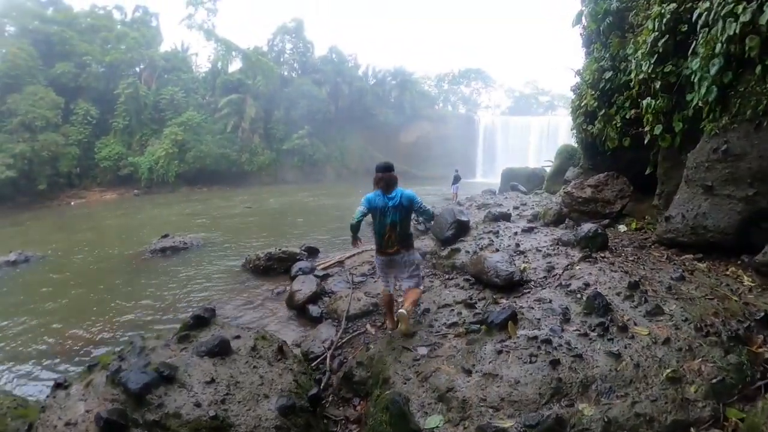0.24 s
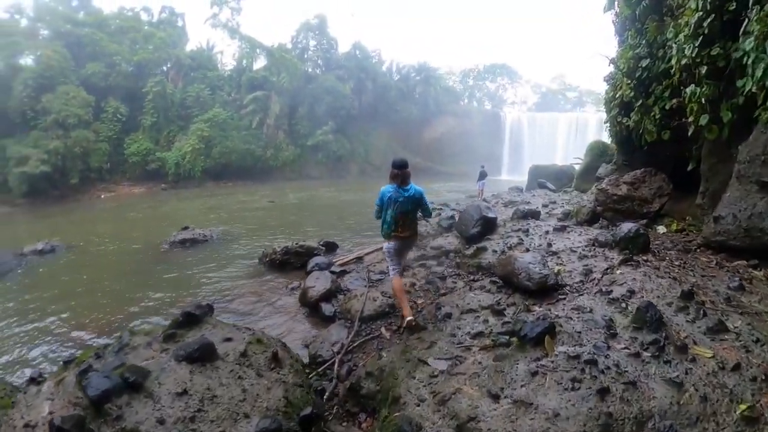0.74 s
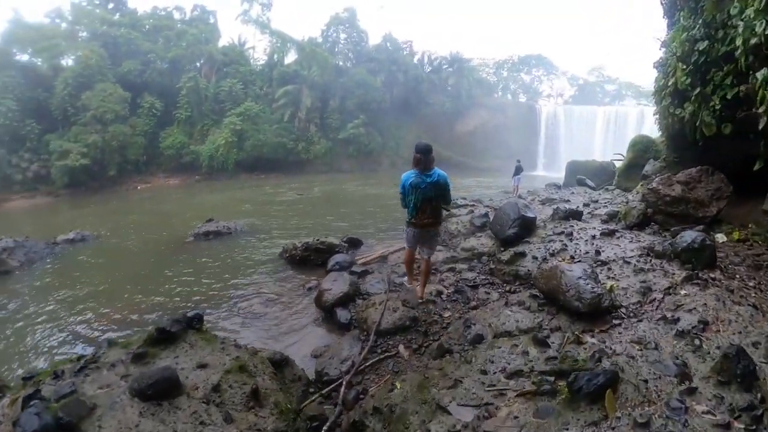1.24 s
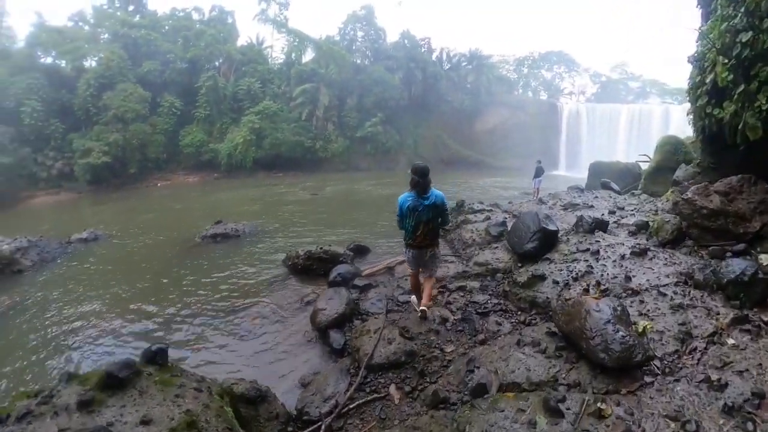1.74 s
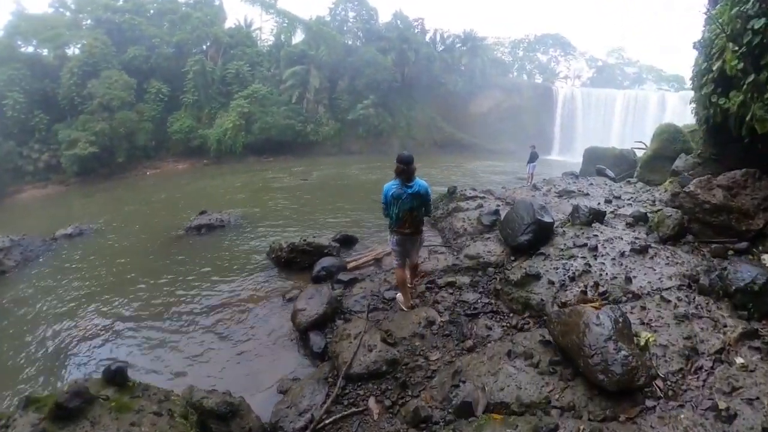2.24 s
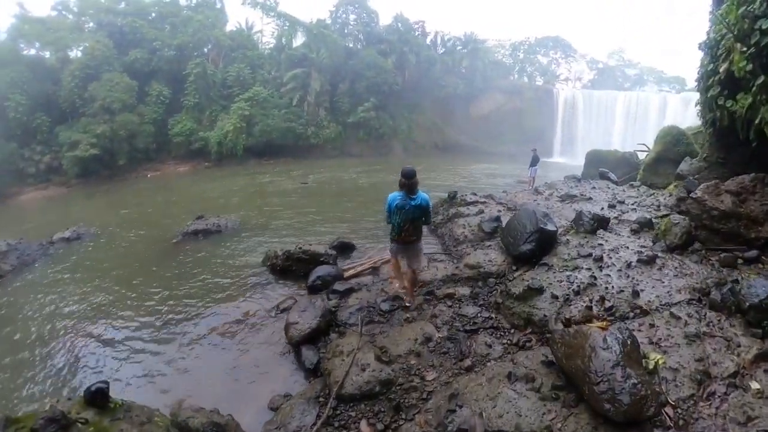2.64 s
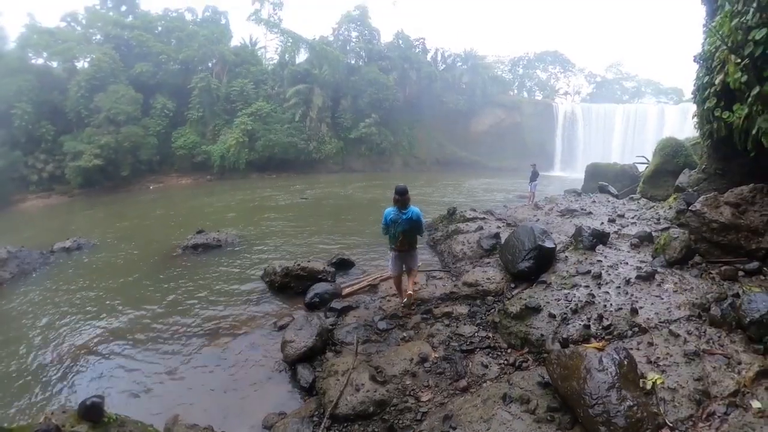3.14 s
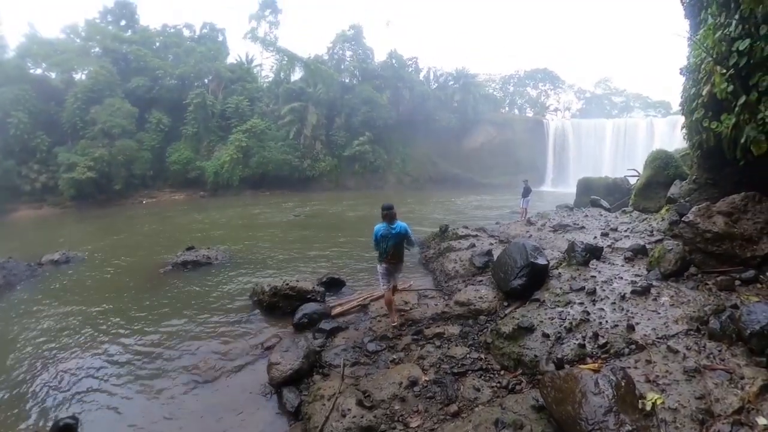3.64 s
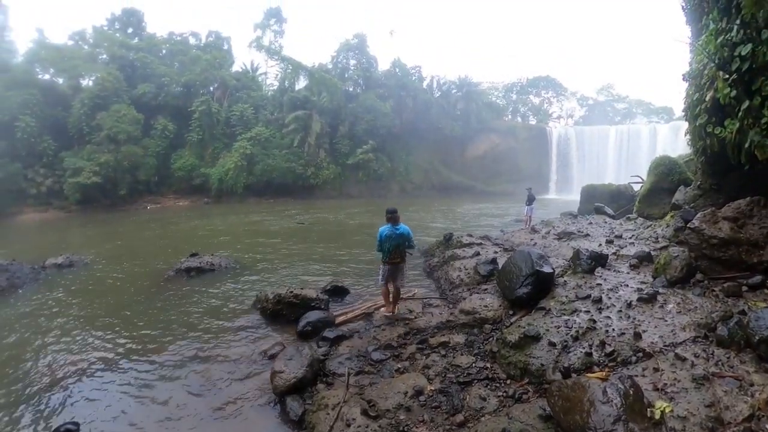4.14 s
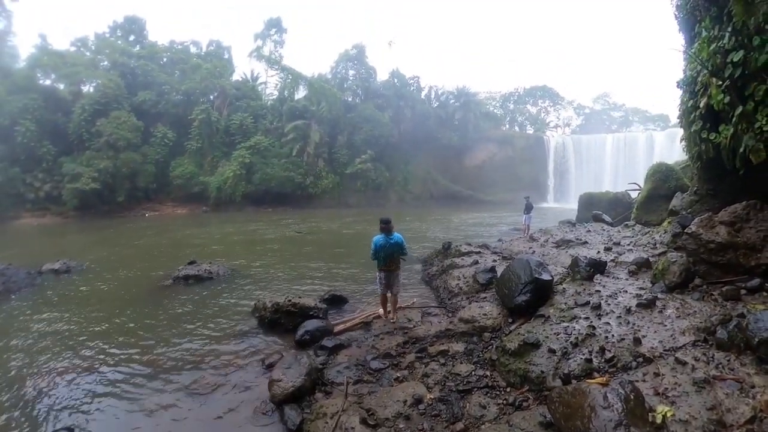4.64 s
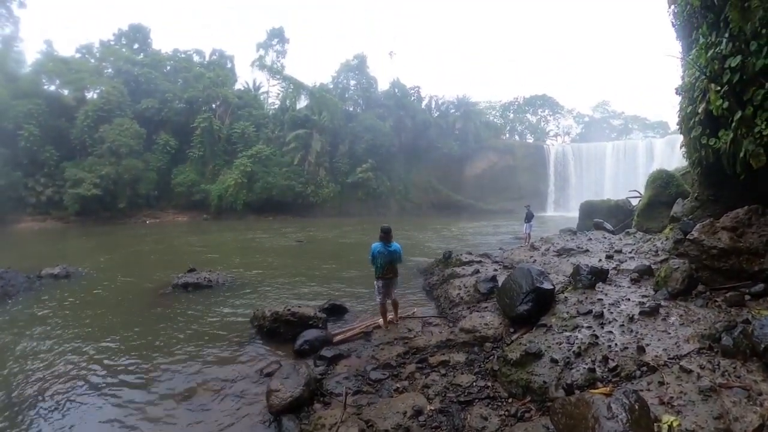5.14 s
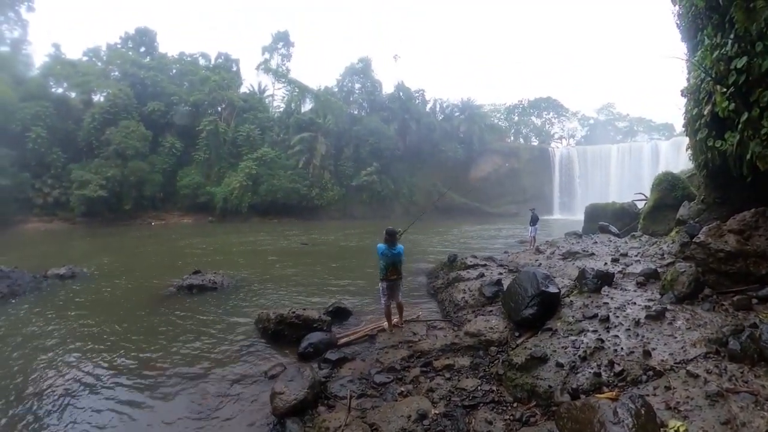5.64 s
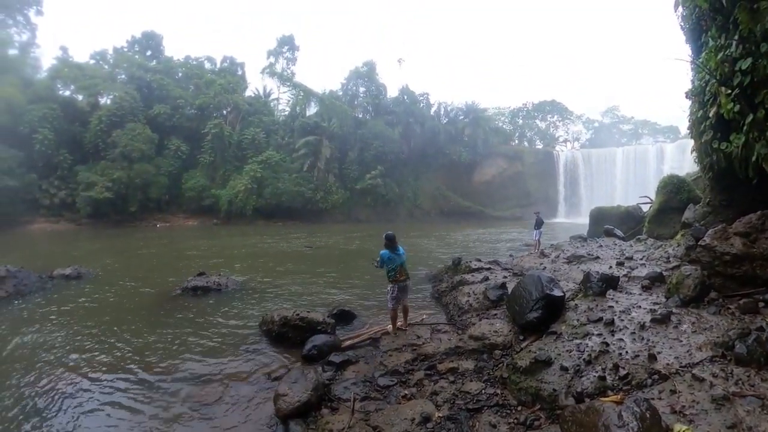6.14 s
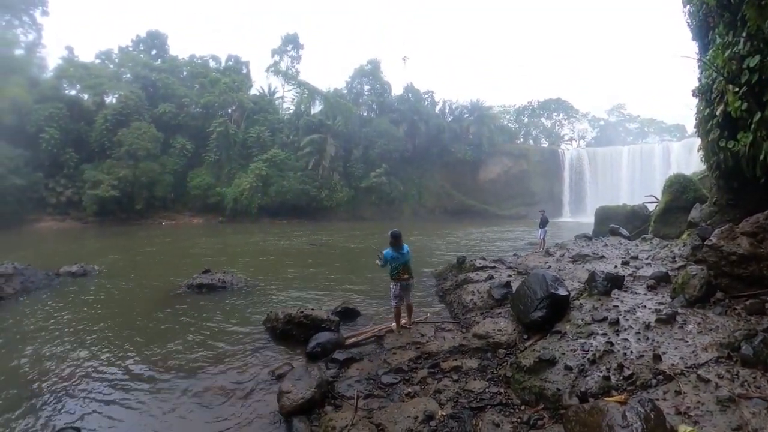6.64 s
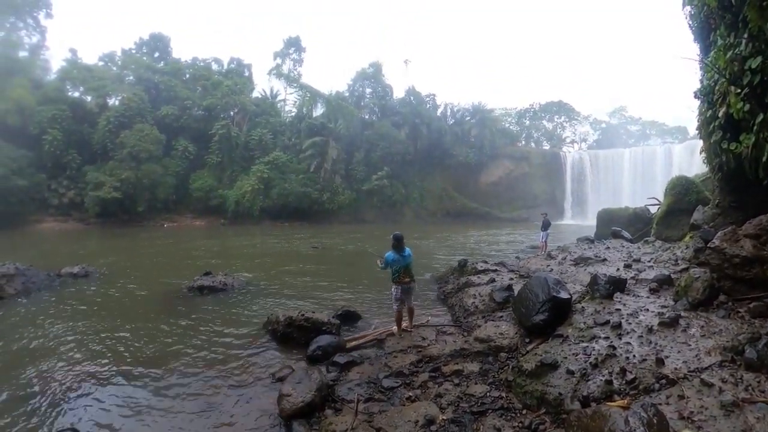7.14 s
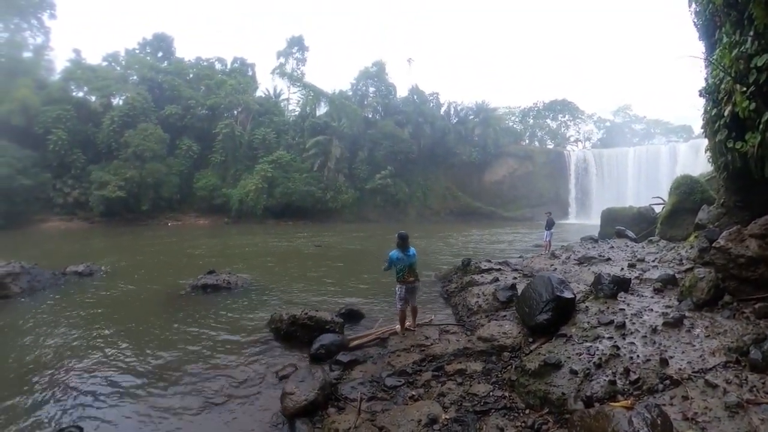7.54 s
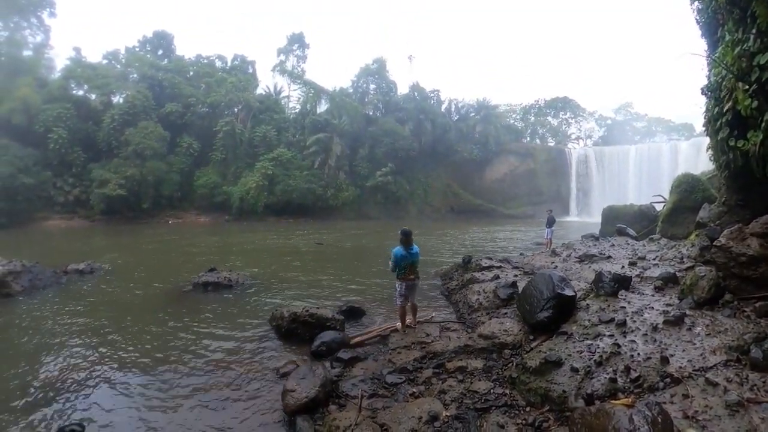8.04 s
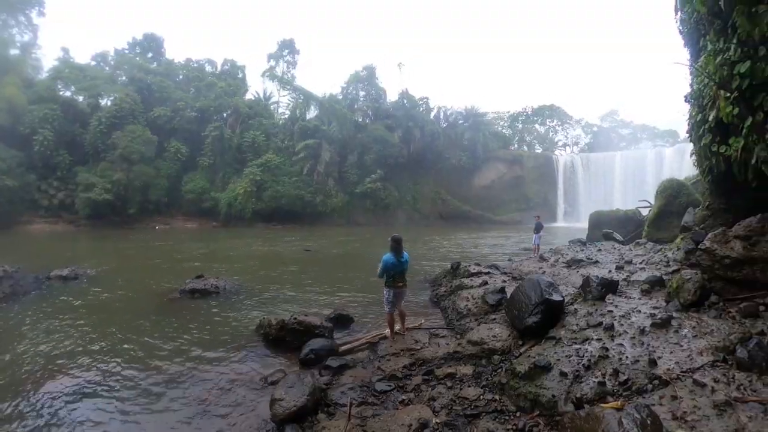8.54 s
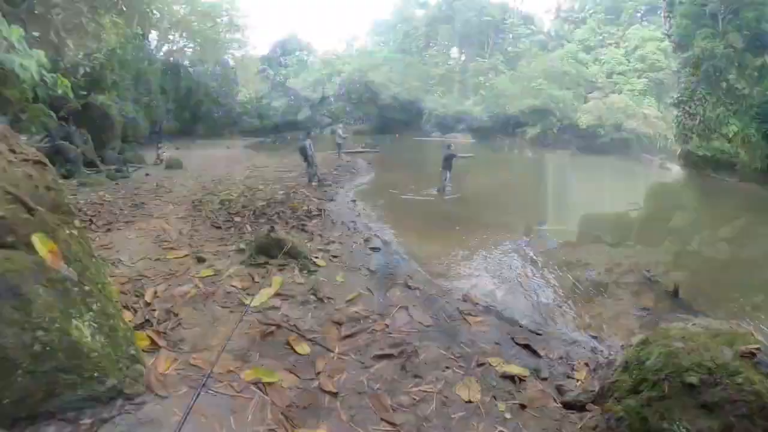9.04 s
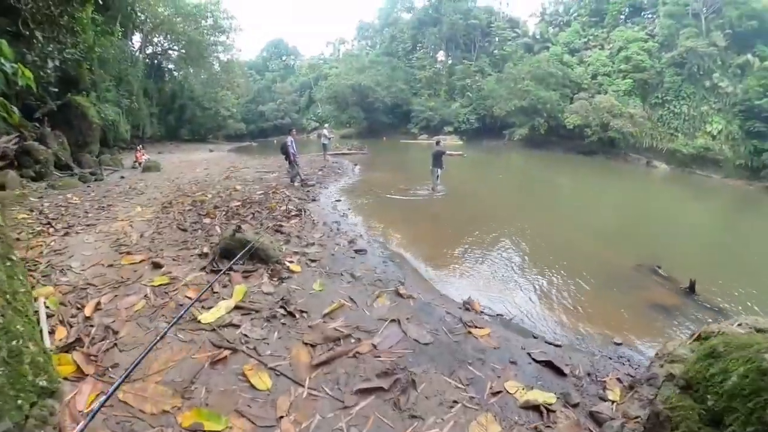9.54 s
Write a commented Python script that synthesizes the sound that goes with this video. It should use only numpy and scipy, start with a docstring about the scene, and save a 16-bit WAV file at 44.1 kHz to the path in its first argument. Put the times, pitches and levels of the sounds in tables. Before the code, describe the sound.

A big waterfall roars steadily with deep rumble and hiss, a few dull handling thuds, then fades quickly into a quiet riverbank with faint splashes.

```python
"""A large waterfall roars across a river pool, heard through a hand-held camera with a ringing housing.
At first a rock wall shades the roar and adds a dull echo; both weaken as the camera walks away from it.
Two faint wet steps hiss early on, then the hand bumps the housing: damped modes thud in the left port.
Near the end the roar, shaped from noise, cross-fades into a quiet river bank: a dull mono rumble of
low noise, faint wading splashes of band-limited noise, and one soft knock of two damped modes."""
import sys
import numpy as np
from scipy import signal
from scipy.fft import rfft, irfft
from scipy.io import wavfile
from scipy.ndimage import uniform_filter1d

SR = 44100
rng = np.random.default_rng(int(sys.argv[2]) if len(sys.argv) > 2 else 0)


def wav_record(signal):
    """Record a signal, one row per channel, as 16-bit PCM in the file named by sys.argv[1]."""
    frames = np.transpose(np.atleast_2d(signal))
    bounded = np.clip(frames, -1, 1)
    # unit amplitude maps onto the largest positive 16-bit level
    quanta = np.round(bounded * 32767).astype(np.int16)
    wavfile.write(sys.argv[1], SR, quanta)


N = 432180
TIME = np.arange(N) / SR   # seconds
FREQS = np.maximum(np.arange(N // 2 + 1) * SR / N, 1)   # Hz, kept above zero for the logarithm

FADE_START_S, FADE_END_S = 8.87, 9.243
CUTOFF_HZ = 15400
SOUND_M_PER_S = 343
# within about this distance [m] the rock shelters the camera; its echo has this gain at full shelter
SHELTER_M, ECHO_STRENGTH = 1.093, 0.33

# Basic spectrum of the falling water. Each row: frequency in Hz, density in dB per Hz.
FALL_SPECTRUM = [(5, -67), (19, -48.5), (66, -39.3), (100, -46), (160, -48), (430, -64), (1000, -65.5),
                 (1900, -58.5), (2700, -62.5), (3700, -66.5), (4700, -70.3), (5800, -73), (6200, -70),
                 (7800, -74), (8500, -85), (9200, -94), (9900, -98), (10500, -106), (12500, -105),
                 (14500, -110.6)]
# Lifts and hollows the rocky basin gives the low roar.
# Each row: centre in Hz, width in Hz, lift (or cut) in dB.
BASIN_MODES = [(70.7, 11, 2), (109, 26, -0.5), (152, 24, 1), (194, 51, -2), (254.4, 50, 1.5), (364, 88, 1),
               (514, 120, -2)]
# Resonances and one dip of the camera housing. Each row: centre in Hz, width in Hz, lift (or cut) in dB.
HOUSING_MODES = [(809.5, 318, 11.5), (1024, 158, -3.5), (1370, 507, 9)]
# How the two microphone ports differ.
# Each row: frequency in Hz, left minus right level in dB, left phase lead in radians, likeness from 0 to 1.
PORTS = [(40, -2.3, 0.1, 0.986), (150, -1.6, 0.02, 0.999), (420, 0.4, -0.05, 0.991),
         (600, 4.5, -0.16, 0.986), (700, 8.6, -0.37, 0.987), (820, 13.4, -1.37, 0.975),
         (930, 8.9, -2.39, 0.975), (1020, 3.6, -2.8, 0.978), (1100, 0.9, -3.08, 0.99),
         (1450, 1.4, -2.9, 0.99), (2300, 2.3, -2.6, 0.953), (3700, 2.1, -2.26, 0.905),
         (5800, 2.2, -1.84, 0.768), (7900, 4.6, -1.68, 0.606), (8500, 2.8, -2.1, 0.446),
         (9200, -23.7, 0, 0.019), (11500, -13.7, 0, 0.006), (13500, -0.6, 0, 0.754)]
# The camera's walk out from beside the rock wall. Each row: time in seconds, distance to the rock in metres.
ROCK_DISTANCE = [(0, 0.63), (0.8, 0.66), (1.3, 0.64), (1.9, 0.82), (2.3, 1.037), (3.5, 1.12)]
# Colour of the roar in the rock's shelter. Each row: frequency in Hz, change in dB.
SHELTER_COLOUR = [(65, -5), (125, 2), (190, 0.5), (280, -1.5), (450, 0.5), (800, -3), (980, -5.5),
                  (1110, 3), (1280, 1), (1500, -2), (2500, -0.5)]
# Swells and sags of the deep rumble. Each row: time in seconds, level in dB relative to the evened rumble.
RUMBLE_LEVEL = [(0, 1), (1.6, 0.5), (2.02, 3.5), (2.2, -3.5), (2.8, -1.5), (3.03, 2.5), (3.45, -3.5),
                (3.95, 0.5), (4.3, 0), (4.6, -1.5), (5.05, -0.5), (5.7, -1.3), (6.25, 0.3), (7.1, -0.5),
                (7.55, 1), (8.13, -1.5), (8.35, 1.5), (8.8, -2.5)]
# Bumps of the hand by the left port; a soft touch reaches only the low modes.
# Each row: start in seconds, strength in dB, reach in Hz.
BUMPS = [(3.112, -17, 400), (3.146, -13, 950), (3.238, -1, 160), (3.511, -15.5, 1400), (4.39, -12, 301.1)]
# What the housing rings with when touched.
# Each row: pitch in Hz, level in dB relative to the bump, ring time to -60 dB in seconds.
BUMP_MODES = [(57, -5, .09), (221, -8.5, 0.17), (516, 0, .07), (940, 0, 0.041)]
# Feet in wet mud and shallow water.
# Each row: centre in seconds, level in dB before the bell envelope, half length in seconds,
# lowest frequency in Hz, highest frequency in Hz.
SPLASHES = [(0.797, -64, .025, 10500, 15000), (1.07, -62, 0.037, 10500, 15000),
            (9.268, -67, .006, 1400, 3400), (9.315, -55, .009, 1300, 3100), (9.33, -47.5, .02, 550, 1700),
            (9.334, -63, .008, 1300, 3200), (9.617, -68, .045, 1600, 3600), (9.76, -46.5, .05, 400, 950),
            (9.77, -68, .04, 1300, 3000)]
# Air and slow river at the quiet bank. Each row: frequency in Hz, density in dB per Hz.
BANK_SPECTRUM = [(8, -54), (22, -44.5), (55, -44.5), (100, -49), (175, -57), (250, -65), (400, -69),
                 (620, -72.5), (1000, -78.7), (1500, -88.5), (2500, -103), (4000, -114), (8000, -135.2),
                 (15000, -140.0)]
# The bank's rumble settling after a first gust. Each row: time in seconds, level in dB.
BANK_LEVEL = [(9.15, 0), (9.33, 1.5), (9.52, -1), (9.65, -.5), (9.78, -0.5)]
# The two modes of one soft knock at the bank.
# Each row: start in seconds, level in dB before the envelope, pitch in Hz, ring time to -60 dB in seconds.
KNOCK_MODES = [(9.693, -20, 590, 0.024), (9.694, -19.5, 720, 0.022)]


def from_db(db):
    """Turn decibels into gain."""
    return 10 ** (np.asarray(db) / 20)


def rms_one(x):
    """Scale a signal to unit rms."""
    return x / np.sqrt(np.mean(x ** 2) + 1e-20)


def in_time(rows):
    """Draw each column of a time curve at every sample."""
    s, *columns = np.transpose(rows)
    return [np.interp(TIME, s, column) for column in columns]


def in_frequency(rows):
    """Draw each column of a spectrum at every frequency, on a logarithmic pitch scale."""
    hz, *columns = np.transpose(rows)
    return [np.interp(np.log(FREQS), np.log(hz), column) for column in columns]


def white():
    """Give the spectrum of fresh white noise with unit power per Hz."""
    return rfft(rng.standard_normal(N)) * np.sqrt(SR / 2)


def below(edge_hz, order=4):
    """Give smooth low-pass weights that reach one half at the edge."""
    return 1 / (1 + (FREQS / edge_hz) ** order)


def drift(rate_hz):
    """Wander at random, mostly slower than the rate, with unit rms."""
    return rms_one(irfft(white() * below(rate_hz, order=2), N))


def waterfall(churn_db=0.47, churn_hz=5, rush_from_hz=260, spray_from_hz=1100):
    """Countless impacts merge into one roar of noise, which reaches both ports through the housing."""
    colour_db, = in_frequency(FALL_SPECTRUM)
    for hz, width, db in BASIN_MODES + HOUSING_MODES:
        colour_db = colour_db + db / (1 + (2 * (FREQS - hz) / width) ** 2)

    balance_db, lead, alike = in_frequency(PORTS)
    alike = np.clip(alike, 0, 1)
    # the lows are largely common to both ports; the fine spray is far less alike
    common = np.sqrt(alike) * white()
    left = common + np.sqrt(1 - alike) * white()
    right = common + np.sqrt(1 - alike) * white()
    # the left port rings harder and turns its phase over above that resonance
    left = left * from_db(balance_db / 2) * np.exp(1j * lead)
    right = right * from_db(-balance_db / 2)
    roar = from_db(colour_db) * np.array([left, right])

    # plunge, rush and spray each churn a little on their own
    low = below(rush_from_hz)
    low_and_middle = below(spray_from_hz, order=8)
    churned = np.zeros((2, N))
    for share in [low, low_and_middle - low, 1 - low_and_middle]:
        churned += irfft(roar * share, N) * from_db(churn_db * drift(churn_hz))
    return churned


def past_the_rock(roar, order=12):
    """The rock shades and echoes the roar; its shelter falls away as the camera clears its edge."""
    distance_m, = in_time(ROCK_DISTANCE)
    shelter = 1 / (1 + (distance_m / SHELTER_M) ** order)
    shade_db, = in_frequency(SHELTER_COLOUR)
    shaded = irfft(rfft(roar) * from_db(shade_db), N)
    # swing the colour to either side of the plain roar, about the mean shelter
    heard = roar + (shelter - shelter.mean()) * (shaded - roar)
    return heard + shelter * rock_echo(heard, distance_m)


def rock_echo(x, distance_m, dull_hz=600):
    """A dull reflection arrives later as the rock recedes, so a low ridge in the roar slides down."""
    dull = irfft(rfft(x) * below(dull_hz), N)
    sent = TIME - 2 * distance_m / SOUND_M_PER_S
    return ECHO_STRENGTH * np.array([np.interp(sent, TIME, side) for side in dull])


def swelling(roar, rumble_below_hz=115, even_s=0.2):
    """The deepest part of the roar is evened out, then follows its slow swells."""
    rumble = irfft(rfft(roar) * below(rumble_below_hz, order=8), N)
    power = uniform_filter1d(np.mean(rumble ** 2, axis=0), int(even_s * SR))
    level_db, = in_time(RUMBLE_LEVEL)
    gain = from_db(level_db) * np.sqrt(power.mean() / power)
    return roar + rumble * (gain - 1)


def hand_bumps(order=3):
    """Every bump rings the same housing modes; those well above its reach are barely stirred."""
    rings = []
    for s, db, reach_hz in BUMPS:
        for hz, mode_db, t60 in BUMP_MODES:
            softening_db = 20 * np.log10(1 + (hz / reach_hz) ** order)
            rings.append((s, db + mode_db - softening_db, hz, t60))
    return damped_modes(rings, rise_s=0.0021)


def damped_modes(rows, rise_s):
    """Each soft contact sets a mode ringing: a sine that rises quickly and dies exponentially."""
    out = np.zeros(N)
    for s, db, hz, t60 in rows:
        span = slice(int(s * SR), int((s + 2 * t60) * SR))
        age = np.maximum(TIME[span] - s, 0)
        rise = 1 - np.exp(-age / rise_s)
        decay = np.exp(-np.log(1000) * age / t60)
        out[span] += from_db(db) * rise * decay * np.sin(2 * np.pi * hz * age)
    return out


def splashes(grain_db=2.2, grain_hz=200):
    """Feet push through mud and shallows: short, grainy swishes of noise with soft band edges."""
    out = np.zeros(N)
    droplets = rng.standard_normal(N) * from_db(grain_db * drift(grain_hz))
    for s, db, half_length, low_hz, high_hz in SPLASHES:
        span = slice(int((s - 2 * half_length) * SR), int((s + 2 * half_length) * SR))
        band = signal.butter(3, [low_hz, high_hz], "band", fs=SR, output="sos")
        spray = signal.sosfilt(band, droplets[span])
        bell = np.exp(-((TIME[span] - s) / half_length) ** 2)
        out[span] += from_db(db) * bell * rms_one(spray)
    return out


def bank_knock():
    """One soft contact rings two close modes that die within a few hundredths of a second."""
    return damped_modes(KNOCK_MODES, rise_s=0.003)


def river_bank(gust_db=1.0, gust_hz=8):
    """Moving air on the camera and slow water: a dull, uneven rumble with almost no treble."""
    colour_db, = in_frequency(BANK_SPECTRUM)
    level_db, = in_time(BANK_LEVEL)
    return irfft(white() * from_db(colour_db), N) * from_db(level_db + gust_db * drift(gust_hz))


def scene():
    """The waterfall, cross-faded into the quiet bank, with wet steps in both places."""
    fall = swelling(past_the_rock(waterfall()))
    fall[0] += hand_bumps()   # left port only
    bank = river_bank() + bank_knock()
    fade = np.clip((TIME - FADE_START_S) / (FADE_END_S - FADE_START_S), 0, 1)
    return (1 - fade) * fall + fade * bank + splashes()


def record(dry):
    """The sound eases out over its last milliseconds; the top is cut steeply."""
    ease = np.clip((TIME[-1] - TIME) / 0.004, 0, 1)
    # the cut is 60 dB deep from the cutoff upward
    top_cut = signal.cheby2(18, 60, CUTOFF_HZ, fs=SR, output="sos")
    return signal.sosfilt(top_cut, dry * ease)


dry = scene()
out = record(dry)
wav_record(out)
```